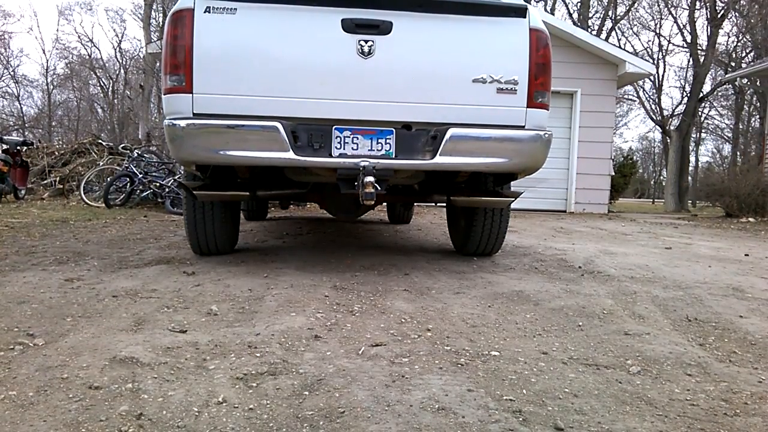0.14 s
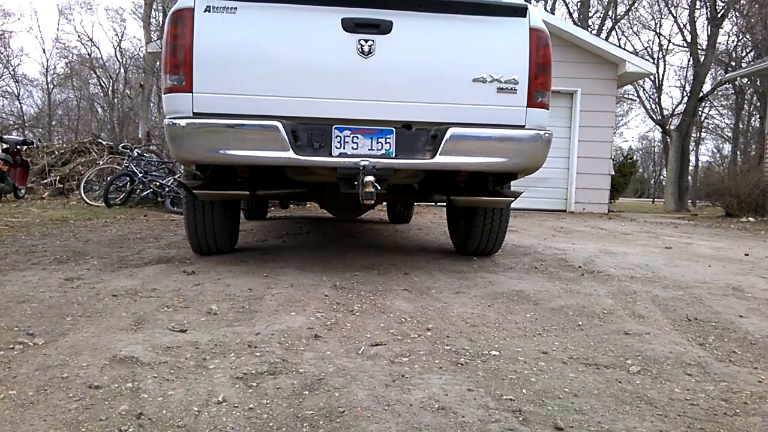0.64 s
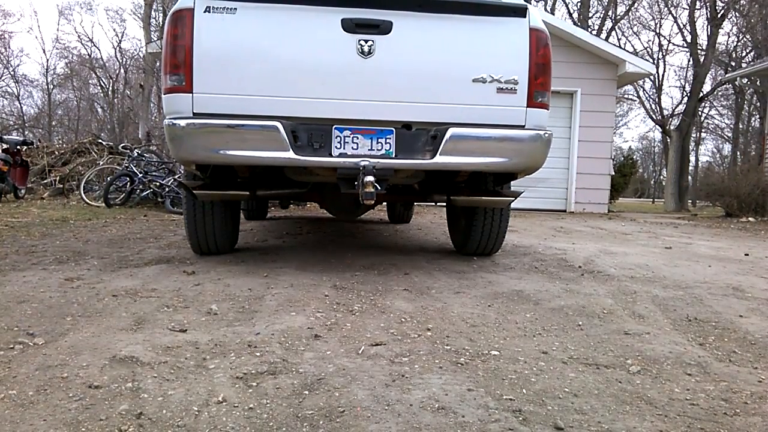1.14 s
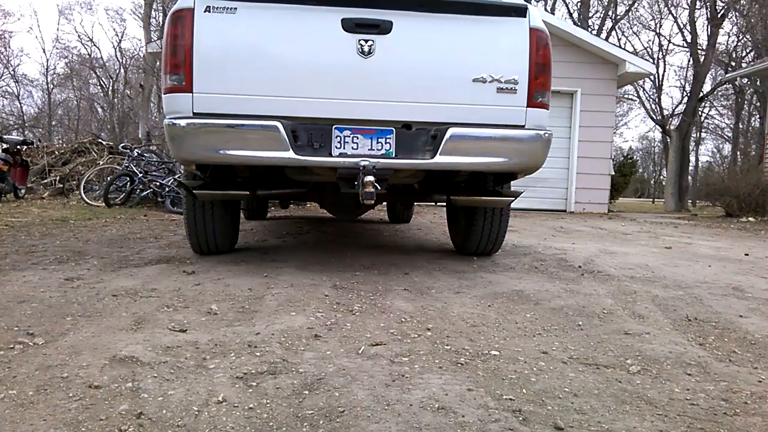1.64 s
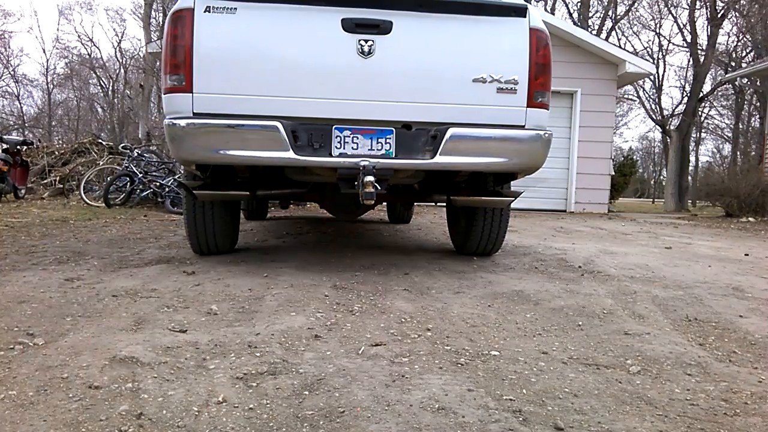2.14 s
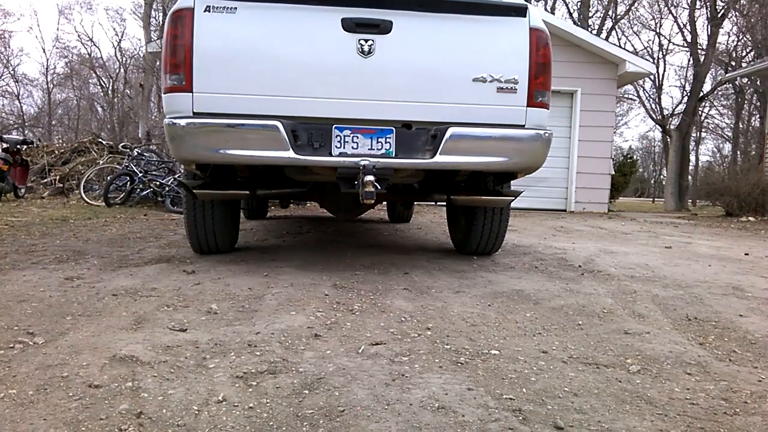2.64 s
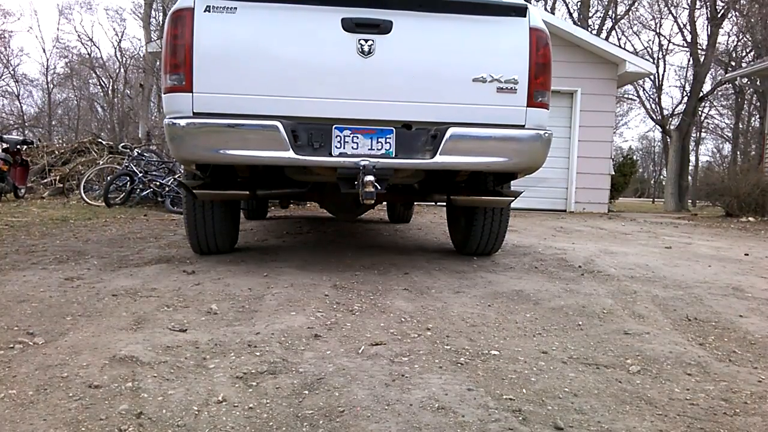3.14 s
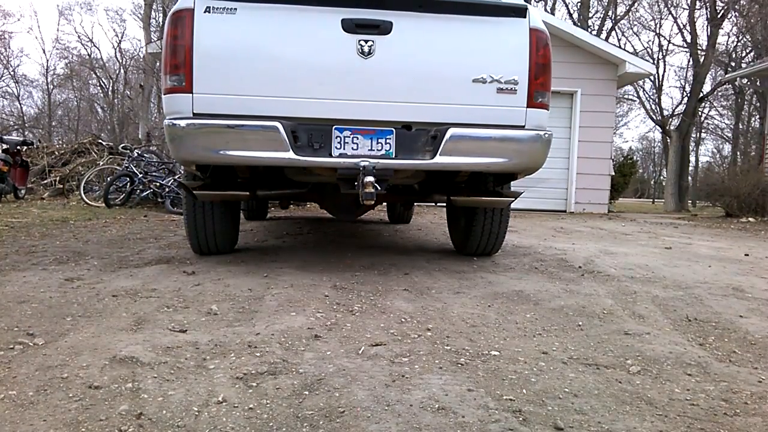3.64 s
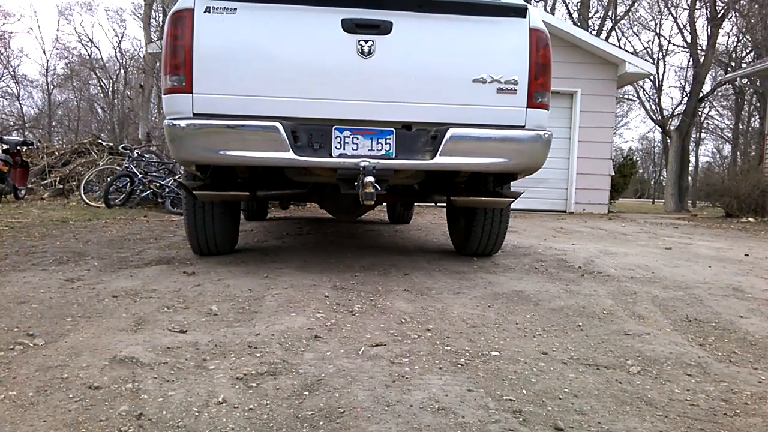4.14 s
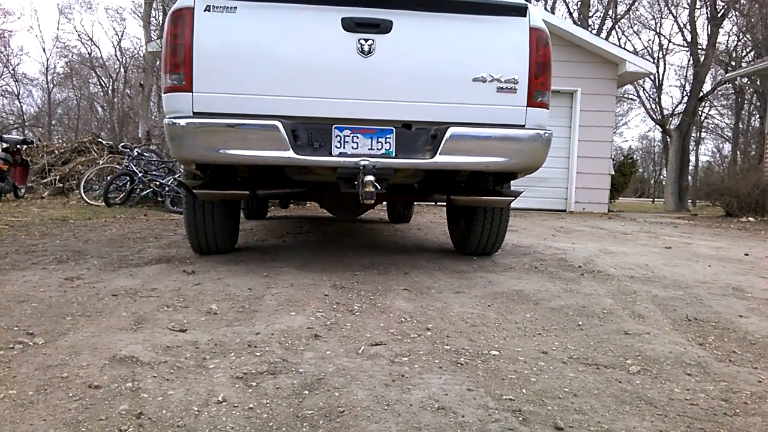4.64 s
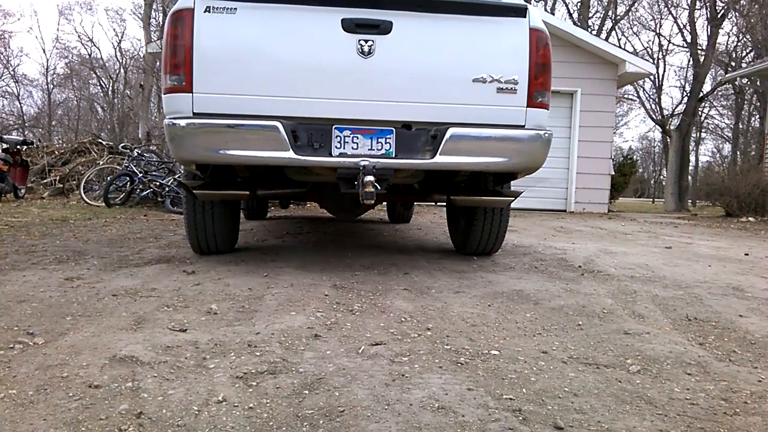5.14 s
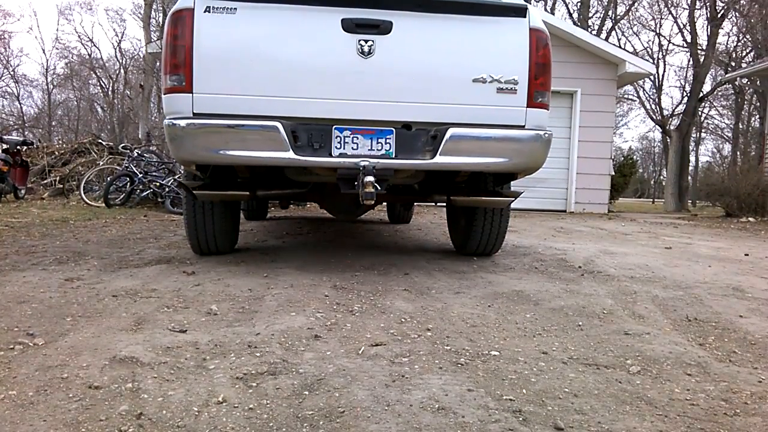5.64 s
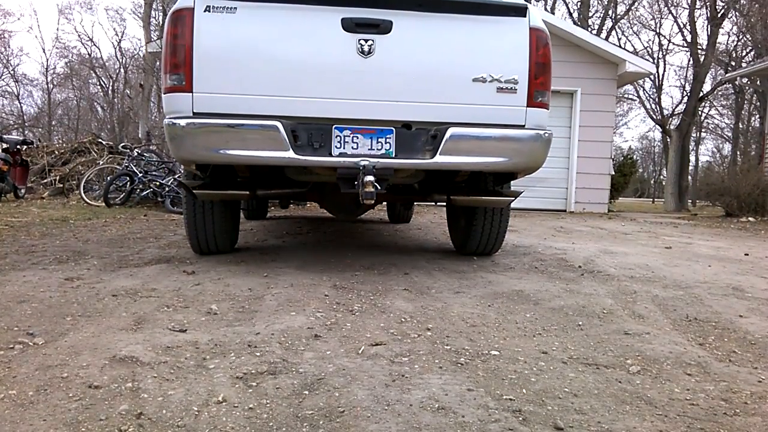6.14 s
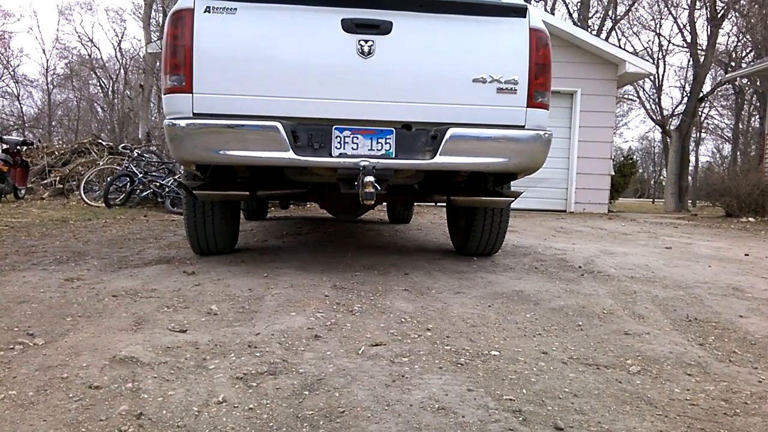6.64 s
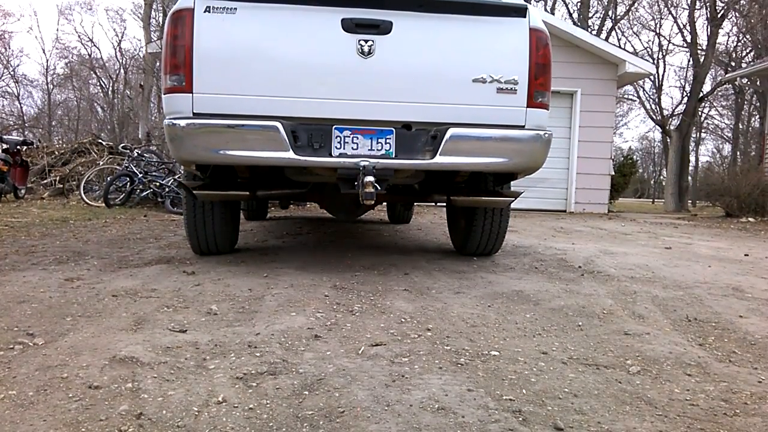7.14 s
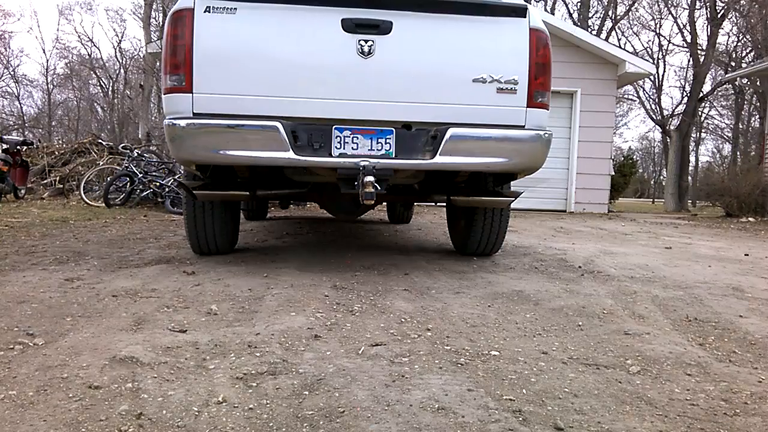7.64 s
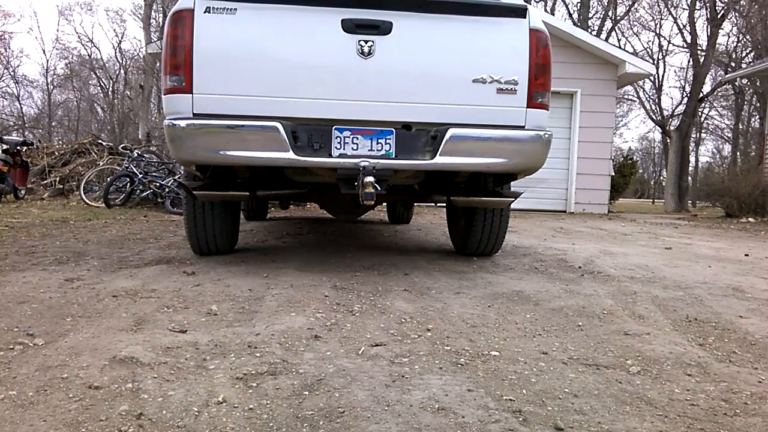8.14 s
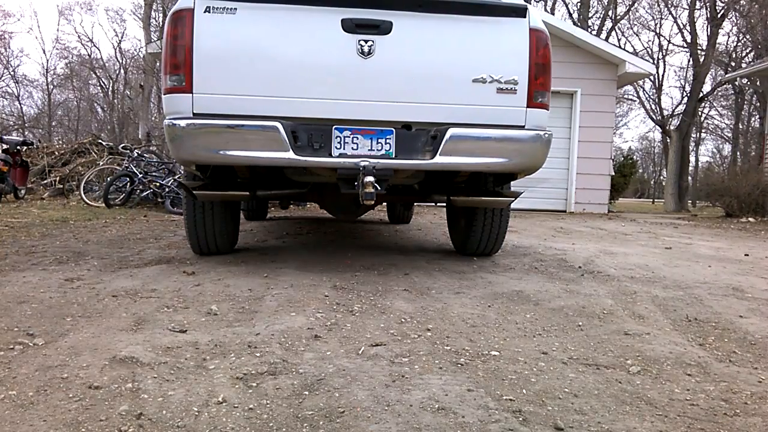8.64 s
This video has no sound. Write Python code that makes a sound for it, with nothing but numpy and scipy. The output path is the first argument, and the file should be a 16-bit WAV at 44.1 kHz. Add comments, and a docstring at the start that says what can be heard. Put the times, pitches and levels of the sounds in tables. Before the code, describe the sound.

A starter grinds briefly, then a V8 pickup with open pipes barks to life, flares loudly, settles into a loping idle and revs again.

```python
"""V8 pickup start-up

A V8 pickup with open twin pipes, heard from low behind it in a yard. Geared noise cranks, the engine
catches with barking pops, flares, sags, settles to a loping idle, then the throttle opens again.
Firings are shaped pressure puffs that ring pipe and tip modes; gas and gears are coloured noise.
Low orders, a sliding whistle, rasps, knocks and dull echoes join in; a limiter ducks the peaks."""
import sys
import numpy as np
from scipy import signal
from scipy.fft import rfft, irfft
from scipy.io import wavfile
from scipy.ndimage import uniform_filter1d, minimum_filter1d

SR = 44100
rng = np.random.default_rng(int(sys.argv[2]) if len(sys.argv) > 2 else 0)


def wav_out(sig):
    """Save sig, one row per channel (or a flat mono array), as 16-bit PCM at SR to the path in sys.argv[1]."""
    wavfile.write(sys.argv[1], SR, np.round(np.clip(np.atleast_2d(sig).T, -1, 1) * 32767).astype(np.int16))


def volts_from_db(level):
    """Convert decibel levels to linear amplitude ratios."""
    exponent = np.asarray(level, float) / 20
    return 10 ** exponent


N = 387198

# Engine speed. Each row: time in seconds, four-stroke cycles per second.
CRANK = [(.68, 7), (.8, 10), (1, 13.7), (1.1, 14.46), (1.8, 12.4), (2.2, 9), (2.6, 8.07), (2.9, 6.75),
         (3.2, 6.55), (3.4, 6.47), (4, 6.93), (4.4, 6.97), (5.3, 6.87), (6.3, 6.89), (6.9, 6.83),
         (7.6, 6.83), (7.9, 7.1), (8.1, 8.1), (8.3, 9.5), (8.5, 12.5), (8.6, 14.4), (8.78, 15.5)]
# Load. Each row: time in seconds, puff strength in dB, gas speed at the tips from 0 to 1.
LOAD = [(.68, -16, 0.95), (.78, -23, 0.96), (1.01, -16, 0.61), (1.12, -15.5, 0.54), (1.18, -24, 0.44),
        (1.38, -15, 0.54), (1.5, -17.5, 0.53), (2.02, -18, 0.38), (2.21, -25.5, 0.19), (2.75, -21, 0.2),
        (2.93, -26, 0.09), (3.11, -28.5, 0.1), (3.66, -26, 0.15), (4.1, -21.5, 0.13), (7.6, -23.5, 0.04),
        (7.85, -22.5, 0.06), (8, -22.5, 0.09), (8.3, -13, 0.49), (8.41, -17.5, 0.57), (8.5, -13.5, 0.73),
        (8.64, -17, 0.48), (8.78, -16.5, 0.61)]
# Cylinders in firing order. Each row: relative puff level in dB, manifold lag in ms at 6.9 cycles/s,
# puff frequency in Hz at 6.9 cycles/s, puff length (sigma) in periods, tip strike in relative dB.
CYLINDERS = [(1, 0.5, 132, 0.33, -10), (-2, 1, 85, 0.33, -6.5), (-0.5, -2.5, 165, 0.41, -11.5),
             (3.5, 0, 98, 0.27, -9.5), (-10, -1, 257, 0.55, -4), (-8.5, 3, 215, 1, -14.5),
             (-1, 0.5, 87.7, 0.48, -9.5), (-2.5, -2, 122, 0.2, -12)]
# Pipe modes. Each row: frequency in Hz, relative level in dB, t60 in seconds.
PIPE_MODES = [(191.4, -6, 0.16), (241, -7, 0.13), (360, -8.5, 0.11), (459.7, -10.5, 0.062)]
# Tailpipe tip modes. Each row: frequency in Hz, relative level in dB, t60 in seconds.
TIP_MODES = [(648.8, -6, 0.12), (722, 0.5, 0.035), (825, -6, 0.036), (1135, -14, 0.063)]
# Long pipe mode. Each row: frequency in Hz, relative level in dB, t60 in seconds.
DRONE_MODES = [(256.8, 0, 0.16)]
# Booms of the long pipe. Each row: centre in seconds, sigma in seconds, gain in dB.
BOOMS = [(1.04, 0.1, -17.5), (1.5, 0.041, -21), (3.66, 0.042, -30), (8.56, 0.13, -21)]
# Rough gas flow in the puffs. Each row: frequency in Hz, relative density in dB per Hz.
TURBULENCE = [(26, -36.5), (45, -12.5), (97, -6.5), (231, -9.5), (389, -14), (443, -5), (494, -21),
              (600, -10.5), (780, -52), (1320, -120)]
# Gas hiss. Each row: frequency in Hz, relative density in dB per Hz.
HISS = [(510, -36.5), (860, -1), (1040, -2), (1170, -2), (1450, -5), (1560, -9), (2100, -14), (2710, -15),
        (3490, -28.5), (5000, -38), (6500, -57.5), (11000, -120)]
# Bright gas sizzle, also the starter's scrape. Each row: frequency in Hz, relative density in dB per Hz.
SIZZLE = [(1500, -16.5), (2300, -2), (3100, -9), (4000, -10), (5000, -15.5), (9000, -25), (15500, -51.5)]
# Uneven spacing of the two banks. Each row: multiple of the cycle, dB over the puffs, dB lost at idle.
ORDERS = [(3, -7, 28.5), (5, -6, 27.5), (8, -1, 10)]
# Low resonances of the pipes. Each row: frequency in Hz, gain in dB.
LOW_PIPE = [(28, -25.5), (40, -2.5), (50, 8), (60, -7.5), (72, -8.5), (85, -1.5), (100, -1), (115, -10.5)]
# Sliding whistle. Each row: seconds from the third firing, frequency in Hz, relative level in dB.
WHOOP = [(-.036, 330, -7), (-.018, 470, -4), (-.006, 620, -2), (.002, 720, 1), (.012, 745, -2),
         (.022, 735, -9), (.044, 725, -9), (.056, 690, -25)]
# Sharp barks under load. Each row: time in seconds, spike level in dB.
BARKS = [(0.682, -11), (0.7009, -9), (0.716, -9.5), (0.7464, -5.5), (.759, -19), (0.773, -4.5), (.7971, -4),
         (.8068, -1), (.842, -5.5), (.872, -7.5), (.8869, -7.5), (.9032, -4.5), (0.925, 2), (.952, -3),
         (0.985, -3), (1.0142, -5), (1.0217, 4), (1.047, -7.5), (1.0759, -13), (1.104, -7), (1.118, -10),
         (1.1337, -4.5), (1.16, -3.5), (1.1758, -4), (1.205, -3.5), (1.229, -2.5), (1.2471, -2.5),
         (1.2996, -4.5), (1.3165, 0.5), (1.373, -16), (1.3894, -6), (1.416, -15.5), (1.445, -19),
         (1.4649, -5.5), (1.5429, -5.5), (1.673, -9), (1.876, -9.5), (1.908, -11.5), (1.966, -9.5),
         (2.065, -22), (8.141, -17), (8.165, -12), (8.213, -14), (8.279, -7.5), (8.307, -8.5),
         (8.3215, -11), (8.346, -7.5), (8.359, -12), (8.3819, 2), (8.4158, -4.5), (8.4557, -3.5),
         (8.477, -7), (8.485, -6), (8.5076, -3), (8.54, -7.5), (8.5717, -3), (8.5951, -5.5), (8.6039, -6),
         (8.6482, 1.5), (8.691, -9.5), (8.716, -4.5)]
# Rasping chirps on the overrun. Each row: time in seconds, peak in dB, frequency in Hz.
RASPS = [(1.04, -31, 1640), (1.108, -28, 1720), (1.402, -35, 1650), (1.546, -31, 1720), (1.624, -32, 1730),
         (1.702, -36, 1600)]
# Short hollow knocks. Each row: time in seconds, peak in dB.
KNOCKS = [(.316, -20.5), (2.791, -15.5), (3.633, -27), (6.6, -19), (7.837, -13.5)]
# Faint accessory tone. Each row: centre in Hz, half width in Hz, rms in dB.
BELT_WHINE = [(2741, 56, -68.5)]
# Starter gear grind. Each row: frequency in Hz, relative density in dB per Hz.
GRIND = [(180, -59), (300, -2.5), (515, -18.5), (556, -1.5), (712, -11.5), (793, -6.5), (985, -10),
         (1240, -5), (1740, -14.5), (2130, -18), (3130, -28), (5550, -31), (12000, -51), (15600, -100),
         (22000, -120)]
# Starter gear tones. Each row: centre in Hz, half width in Hz, dB relative to the grind.
GEAR_WHINE = [(1255, 23, -9), (800, 170, -11.5), (1890, 81, -17.5), (4040, 40, -32), (5300, 60, -35)]
# Starter rumble. Each row: frequency in Hz, relative density in dB per Hz.
RUMBLE = [(15, -27), (25, 6.5), (48, 3), (172, -7), (375, -23.5), (470, -16), (500, -20), (650, -47),
          (1100, -120)]
# Low jolts. Each row: centre in seconds, sigma in seconds, level in dB.
THUMPS = [(.32, 0.0052, -23), (.67, 0.014, -29)]
# The pinion is brightest as it bites. Each row: centre in seconds, sigma in seconds, level in dB.
START_SCRAPE = [(0.0044, 0.048, -49.5)]
# Unfired strokes. Each row: time in seconds (sounds 2.6 ms later), puff level in dB, frequency in Hz.
CHUFFS = [(0.086, -19, 134), (0.206, -19, 113), (0.275, -17.5, 91), (0.316, -35, 91.5)]
# Echoes off ground, wall and trees. Each row: delay in seconds, level in dB.
ECHOES = [(.0095, -19), (.031, -16.5), (.058, -13)]

FIRST_FIRING_EIGHTHS = .52   # eighths of a cycle
# combustion is even at steady speed, uneven while speed changes, worst just after the catch (0-1)
UNEVEN_STEADY, UNEVEN_CHANGING, UNEVEN_CATCH, CATCH_FADE_S = .04, .19, .4, .2
CHANGING_CYCLES_PER_S2 = 1.3
IDLE_PUFF_DB = -24.5
# layers that grow with gas speed: (dB at slow gas, dB gained at full speed)
TIP_RING_DB, GAS_HISS_DB, BRIGHT_SIZZLE_DB = (-50, 29.3), (-49.5, 18.7), (-77.5, 45.05)
BARK_RING_DB = (-20, 17.2)
DRONE_BELOW_PUFFS_DB = 13.5
LOPE_SHARE, LOPE_LOSS_PER_DB = 0.86, 0.22   # how far cylinders differ; weak puffs are more alike
FLOW_SETTLES_S, FIRST_FLOW_SHARE = .775, .3   # first firings stand apart; then gas flows on between
BEAT_FROM_CYCLES_PER_S, BEAT_FULL_CYCLES_PER_S = 7.1, 8.6
EVEN_BEAT_DB_PER_DB = 1.6   # alike puffs give a cleaner beat
WHOOP_DB, WHOOP_LOSS_PER_WEAK_DB = -34.5, 3
WHOOP_TOP_CYCLES_PER_S, WHOOP_LOSS_DB_PER_CYCLE = 7.35, 11.5
KNOCK_HZ, KNOCK_PERIODS = 328, 0.7
FIRST_STROKE_S, STROKE_S = .09, .1225
GRIND_DB, GRIND_SAG_DB = -42, 9
RUMBLE_DB, RUMBLE_DROP_DB, RUMBLE_DROP_S = -33.5, 7.5, .335
LIMIT_PEAK = .71


def exhaust():
    """Eight firings a cycle, each with its own puff; pipes ring, gas hisses in step."""
    at, cycles, rough = firings()
    puff_db, gas = in_time(LOAD)
    tip_db, hiss_db, sizzle_db = (
        slow_db + gain_db * gas for slow_db, gain_db in (TIP_RING_DB, GAS_HISS_DB, BRIGHT_SIZZLE_DB))
    db, lag_ms, hz, periods, ring_db = np.array(CYLINDERS)[np.arange(len(at)) % 8].T
    lope = np.clip(LOPE_SHARE - LOPE_LOSS_PER_DB * weakness_db()[at], 0, 1)
    db, hz = (c.mean() + lope * (c - c.mean()) for c in (db, hz))
    luck = rng.standard_normal((len(at), 5)).T
    faster = cycles / 6.9
    s = at / SR + (lag_ms / faster + 2.5 * rough * luck[0]) / 1000
    # more firings a second share the same power
    sizes = volts_from_db(db + 6 * rough * luck[1]) / np.sqrt(faster)
    # shorter blowdown at speed
    hz = hz * faster ** .75 * (1 + .3 * rough * np.clip(luck[2], -2, 2))

    pipe = rms_one(ring(soften(clicks_at(s, sizes), 1800), PIPE_MODES))
    body = rms_one(puffs(s, sizes, hz, periods, lean=0.38)) + volts_from_db(-12.0) * pipe
    body = rms_one(body) + (.1 + .45 * unevenness()) * coloured(TURBULENCE)

    drone_clicks = clicks_at(s, luck[4] / np.sqrt(faster))
    drone = rms_one(ring(soften(drone_clicks, 570), DRONE_MODES))
    drone_gain = volts_from_db(puff_db - DRONE_BELOW_PUFFS_DB) + swells(BOOMS)

    strike = volts_from_db(ring_db + (3.5 + 2.8 * rough) * np.clip(luck[3], -2, 1.5)) / np.sqrt(faster)
    tip = rms_one(ring(soften(clicks_at(s + 0.002004, strike), 1300), TIP_MODES))

    steady_flow = .7 * np.where(np.arange(N) / SR < FLOW_SETTLES_S, FIRST_FLOW_SHARE, 1)
    flow_clicks = clicks_at(s, (.2 + rough) * np.minimum(abs(luck[4]), 1.5))
    gate = steady_flow + spurts(flow_clicks + 6 * bark_hits(), .005)
    hiss = volts_from_db(hiss_db) * coloured(HISS) + volts_from_db(sizzle_db) * coloured(SIZZLE)
    return catch_fade() * (volts_from_db(puff_db) * body + drone_gain * drone + volts_from_db(tip_db) * tip + gate * hiss)


def bank_beat():
    """Clean low orders of the cycle, strongest above idle where they meet the pipes' low resonances."""
    cycles, = in_time(CRANK)
    turns = np.cumsum(cycles) / SR
    hz, gain_db = np.transpose(LOW_PIPE)
    beat_range = BEAT_FULL_CYCLES_PER_S - BEAT_FROM_CYCLES_PER_S
    idling = 1 - np.clip((cycles - BEAT_FROM_CYCLES_PER_S) / beat_range, 0, 1)
    tones = 0
    for k, db, loss_db in ORDERS:
        order = round(k)
        level_db = db - loss_db * idling + np.interp(order * cycles, hz, gain_db)
        tones = tones + volts_from_db(level_db) * np.sin(2 * np.pi * order * turns)
    load_db = in_time(LOAD)[0] + EVEN_BEAT_DB_PER_DB * idling * weakness_db()
    return tones * volts_from_db(load_db) * (np.arange(N) > CRANK[0][0] * SR)


def whoop():
    """A sliding whistle, played once a cycle with slight change."""
    s, hz, db = np.transpose(WHOOP)
    t = np.arange(s[0], s[-1], 1 / SR)
    at, cycles, _ = (column[2::8] for column in firings())
    strength_db = WHOOP_DB - WHOOP_LOSS_PER_WEAK_DB * weakness_db()[at]
    strength_db -= WHOOP_LOSS_DB_PER_CYCLE * np.maximum(cycles - WHOOP_TOP_CYCLES_PER_S, 0)
    luck = rng.standard_normal((len(at), 2))
    turns = np.cumsum(np.interp(t, s, hz)) / SR * (1 + .003 * luck[:, :1])
    level_db = np.interp(t, s, db) + strength_db[:, None] + 1.8 * luck[:, 1:]
    tone = volts_from_db(level_db) * np.sin(2 * np.pi * turns)
    flutter = coloured([(15, 0), (120, 0)])[:tone.size].reshape(tone.shape)
    tone = tone * (1 + .35 * flutter)   # breathy
    where = np.clip(at[:, None] + int(s[0] * SR) + np.arange(len(t)), 0, N - 1)
    return np.bincount(where.ravel(), tone.ravel(), N)


def barks():
    """A steep suction spike, a pressure hump, a spit of gas, and the tip rings hard."""
    s, db = np.transpose(BARKS)
    same = np.ones(len(s))
    spike = puffs(s, -volts_from_db(db), 300 * same, .12 * same, lean=0)
    hump = puffs(s + 0.0026, volts_from_db(db - 3.5), 140 * same, 0.24 * same, lean=1.0)
    hits = bark_hits()
    tip = ring(soften(soften(hits, 2500), 2200), TIP_MODES)
    spit = spurts(hits, 0.0012) * coloured(HISS)
    return spike + hump + volts_from_db(-4.5) * tip + volts_from_db(-23.5) * spit


def rasps():
    """Brief narrow tones, about fifteen periods long."""
    s, db, hz = np.transpose(RASPS)
    return puffs(s, volts_from_db(db), hz, 5 + 0 * s, lean=0)


def knocks():
    """A compact thump of a few periods."""
    s, db = np.transpose(KNOCKS)
    return puffs(s, volts_from_db(db), KNOCK_HZ + 0 * s, KNOCK_PERIODS + 0 * s, lean=0)


def belt_whine():
    """Faint accessory tone, narrow noise present once the engine fires."""
    return catch_fade() * narrow(BELT_WHINE)


def starter():
    """Gear grind sagging through each stroke, wavering whine, low rumble and chuffs of unfired strokes."""
    t = np.arange(N) / SR
    stroke_phase = (t - FIRST_STROKE_S) / STROKE_S % 1
    grind_db = GRIND_DB - GRIND_SAG_DB * stroke_phase * np.where(t > RUMBLE_DROP_S, 1, .4)
    grind = volts_from_db(grind_db) * (coloured(GRIND) + narrow(GEAR_WHINE))
    rumble_gain = volts_from_db(RUMBLE_DB - RUMBLE_DROP_DB * (t > RUMBLE_DROP_S)) + swells(THUMPS)
    scrape = swells(START_SCRAPE) * coloured(SIZZLE)
    release = np.clip((.72 - t) / 0.05, 0, 1)
    s, db, hz = np.transpose(CHUFFS)
    chuffs = puffs(s + 0.0026, volts_from_db(db), hz, 0.2 + 0 * s, lean=0.37)
    return release * (grind + rumble_gain * coloured(RUMBLE) + scrape) + chuffs


def yard(x):
    """A few dull echoes: delayed, low-passed copies."""
    dull = soften(x, 1400)
    return sum(volts_from_db(db) * np.pad(dull, (int(s * SR), 0))[:N] for s, db in ECHOES)


def air():
    """Faint steady air hiss, coloured noise."""
    return volts_from_db(-70.5) * coloured([(2000, 3), (6000, 0.5), (10000, -12.5), (16000, -10.5)])


def firings():
    """Sample index, cycles per second and unevenness of every firing, from integrated crank speed."""
    (cycles,), uneven = in_time(CRANK), unevenness()
    running = np.arange(N) > CRANK[0][0] * SR
    eighths = 8 * np.cumsum(cycles * running) / SR - FIRST_FIRING_EIGHTHS
    at = np.searchsorted(eighths, np.arange(int(eighths[-1]) + 1))
    return at, cycles[at], uneven[at]


def unevenness():
    """Share of chance in each firing, from how fast the speed changes and the time since the catch."""
    change = uniform_filter1d(np.abs(np.gradient(in_time(CRANK)[0])) * SR, size=SR // 5)
    since_s = np.maximum(np.arange(N) / SR - CRANK[0][0], 0)
    changing = UNEVEN_CHANGING * np.tanh(change / CHANGING_CYCLES_PER_S2)
    return UNEVEN_STEADY + changing + UNEVEN_CATCH * np.exp(-since_s / CATCH_FADE_S)


def weakness_db():
    """How far the puffs fall short of a healthy idle."""
    return np.maximum(IDLE_PUFF_DB - in_time(LOAD)[0], 0)


def catch_fade():
    """8 ms fade-in as the engine catches."""
    return np.clip((np.arange(N) / SR - .672) / .008, 0, 1)


def bark_hits():
    """Clicks on the tip: faster gas strikes harder."""
    s, db = np.transpose(BARKS)
    gas = in_time(LOAD)[1][(s * SR).astype(int)]
    return clicks_at(s - .0005, volts_from_db(db + BARK_RING_DB[0] + BARK_RING_DB[1] * gas))


def puffs(s, sizes, hz, periods, lean):
    """Each puff is a pressure hump between two suction dips; lean deepens the later dip."""
    t = np.arange(-SR // 50, SR // 50) / SR
    turns = t * hz[:, None]
    shape = np.exp(-.5 * (turns / periods[:, None]) ** 2) * np.cos(2 * np.pi * turns + lean)
    at = np.clip((s[:, None] * SR).astype(int) + np.arange(len(t)) - SR // 50, 0, N - 1)
    return np.bincount(at.ravel(), (sizes[:, None] * shape).ravel(), N)


def ring(clicks, modes):
    """Clicks set every mode ringing as a two-pole resonator, signs alternating."""
    out = 0
    for k, (hz, db, t60_s) in enumerate(modes):
        r, w = volts_from_db(-60 / (t60_s * SR)), 2 * np.pi * hz / SR
        gain = volts_from_db(db) * np.sin(w) * (-1) ** k
        out = out + signal.lfilter([0, gain], [1, -2 * r * np.cos(w), r * r], clicks + 1e-18)
    return out


def spurts(clicks, decay_s):
    """A quick swell and decay of gas flow after each click."""
    return soften(signal.lfilter([1], [1, -np.exp(-1 / (decay_s * SR))], clicks + 1e-18), 550)


def clicks_at(s, sizes):
    """One click per time."""
    return np.bincount(np.clip((s * SR).astype(int), 0, N - 1), sizes, N)


def coloured(spectrum):
    """Noise with a given spectrum, rms 1."""
    hz, db = np.transpose(spectrum)
    grid_hz = np.arange(N // 2 + 1) * SR / N + 1e-3
    gain = volts_from_db(np.interp(np.log(grid_hz), np.log(hz), db, -120, -120))
    return rms_one(irfft(rfft(rng.standard_normal(N)) * gain, N))


def narrow(lines):
    """Wavering tones: noise in narrow peaks."""
    return sum(volts_from_db(db) * coloured([(hz - width_hz, -25), (hz, 0), (hz + width_hz, -25)])
               for hz, width_hz, db in lines)


def swells(rows):
    """Bell-shaped gains around given moments."""
    t = np.arange(N) / SR
    return sum(volts_from_db(db) * np.exp(-.5 * ((t - s) / sigma_s) ** 2) for s, sigma_s, db in rows)


def soften(x, hz):
    """Second-order Butterworth low-pass."""
    return signal.sosfilt(signal.butter(2, hz, fs=SR, output="sos"), x)


def in_time(rows):
    """Columns of a curve table at every sample."""
    s, *columns = np.transpose(rows)
    return [np.interp(np.arange(N) / SR, s, c) for c in columns]


def rms_one(x):
    """Scale to rms 1."""
    return x / np.sqrt(np.mean(x ** 2) + 1e-20)


def scene():
    """Truck, its echoes and a faint air hiss."""
    engine = exhaust() + bank_beat() + whoop() + barks() + rasps() + knocks() + belt_whine()
    truck = engine + starter()
    return (truck + yard(truck) + air())[None]


def roll_off(x):
    """The treble ends steeply here."""
    return signal.sosfilt(signal.butter(12, 15710, fs=SR, output="sos"), x)


def record(dry):
    """The bass is trimmed below 35 Hz and a fast limiter ducks the highest peaks."""
    trimmed = signal.sosfilt(signal.butter(2, 35, "high", fs=SR, output="sos"), dry)
    duck = minimum_filter1d(LIMIT_PEAK / np.maximum(np.abs(trimmed), LIMIT_PEAK), size=81)
    smooth_duck = uniform_filter1d(uniform_filter1d(duck, size=41), size=41)
    return roll_off(trimmed * smooth_duck)


dry = scene()
out = record(dry)
wav_out(out)
```